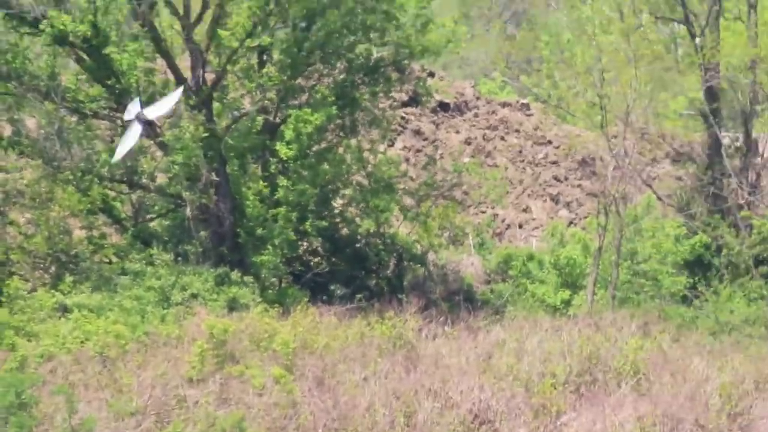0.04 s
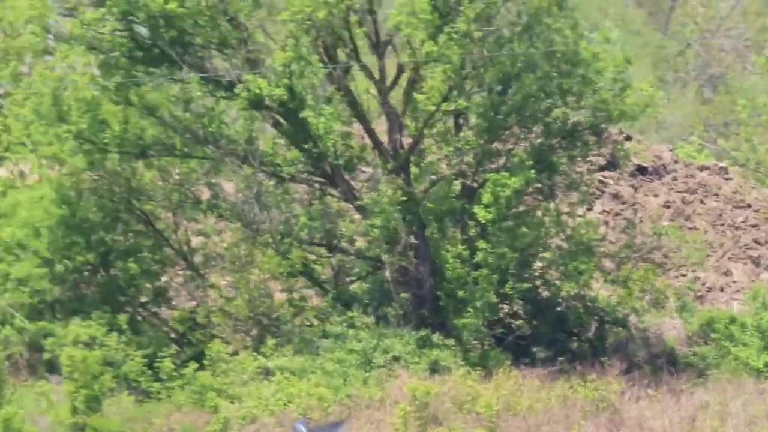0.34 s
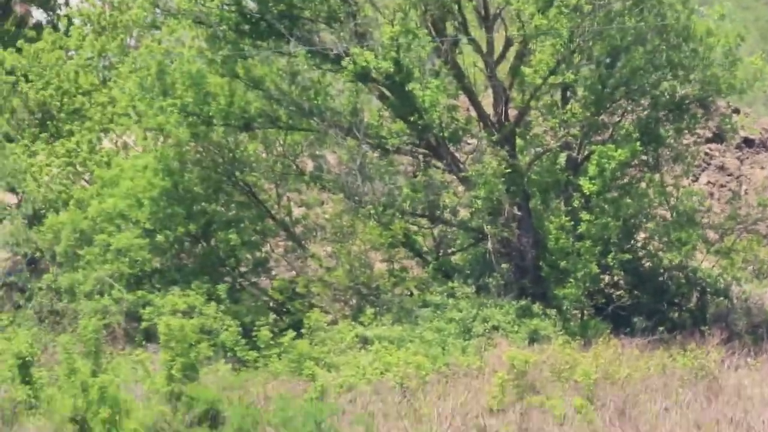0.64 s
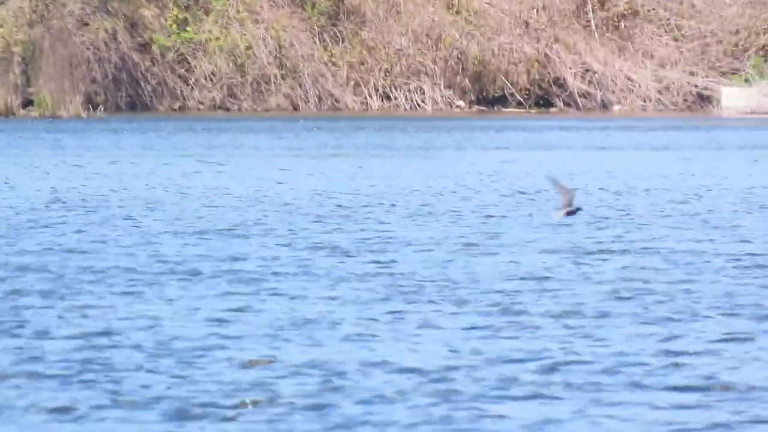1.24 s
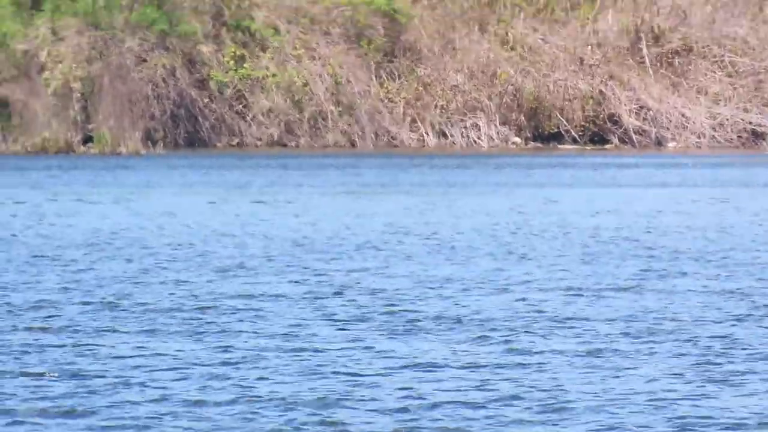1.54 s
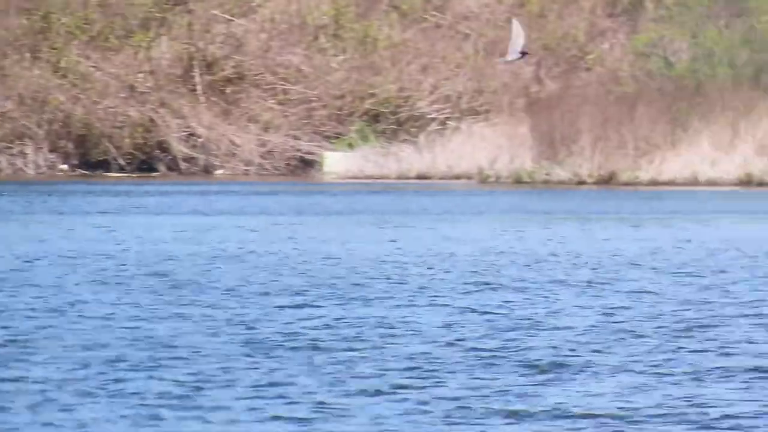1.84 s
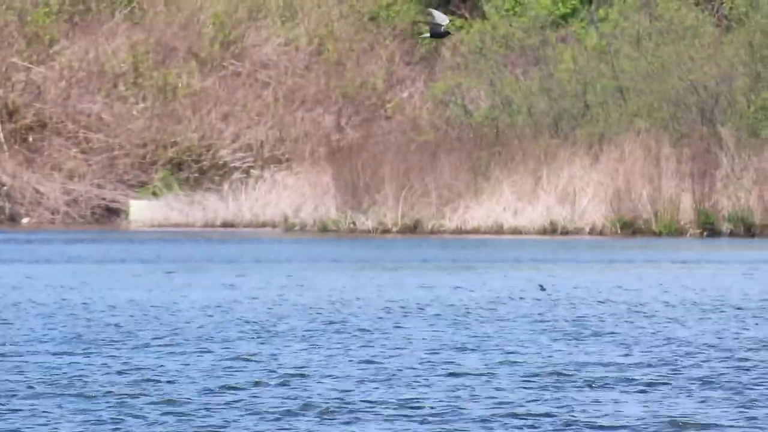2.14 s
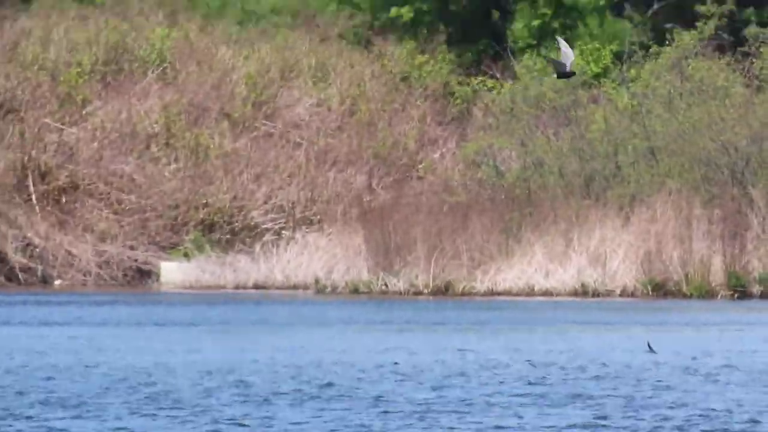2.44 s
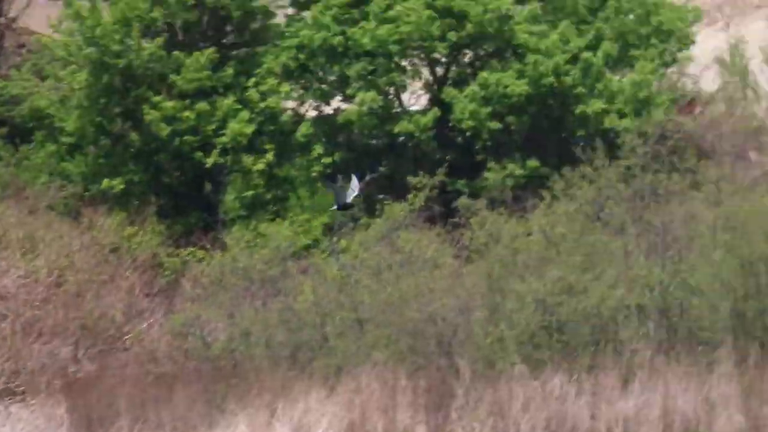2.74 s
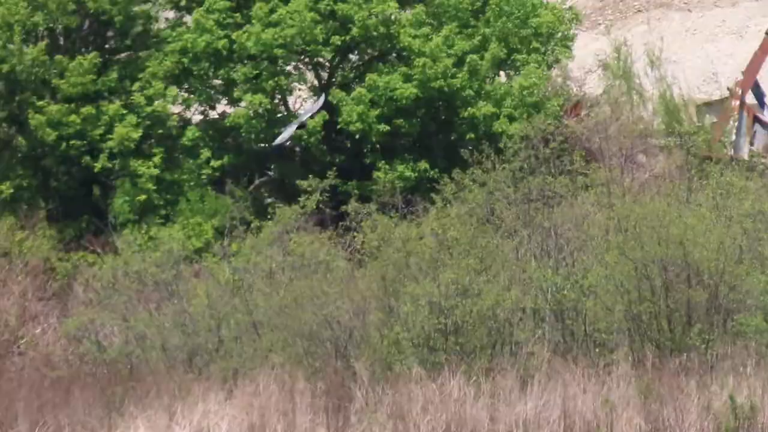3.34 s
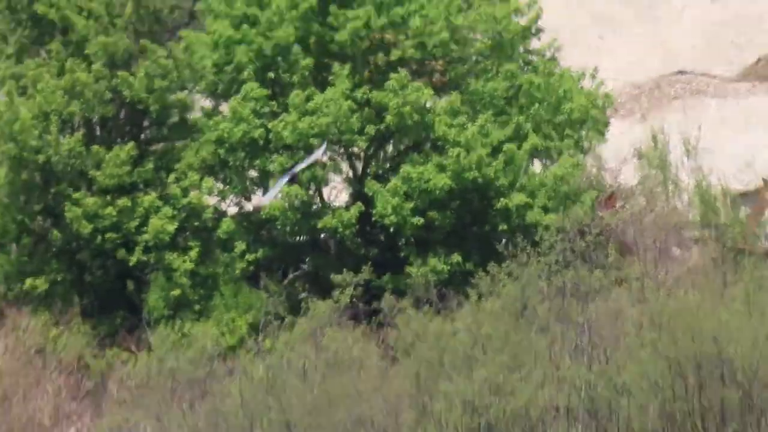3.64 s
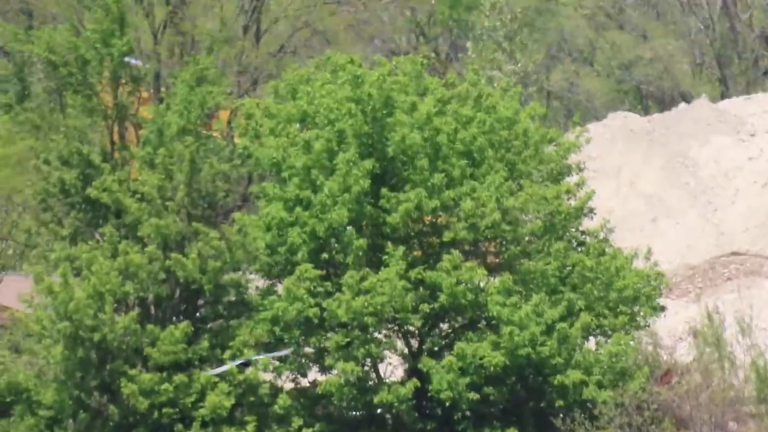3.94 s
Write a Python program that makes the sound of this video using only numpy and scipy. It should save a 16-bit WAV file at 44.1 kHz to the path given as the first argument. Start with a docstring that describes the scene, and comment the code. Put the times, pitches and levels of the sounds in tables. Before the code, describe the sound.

Gusty wind buffets the microphone on a lake shore with low rumble, hollow flutter and short thumps. It is busy through the first second, uneven afterwards, calmer from 3 to 3.6 seconds, then strongest from 3.8. Distant road noise and a soft hiss of reeds and water continue throughout. Faint, far birds whistle from 0.6 seconds, trill just after 1, and give one longer whistle from 2 to 2.5.

```python
"""Lake shore in gusty wind. Eddies buffet the microphone: a low rumble that opens into a hollow
flutter when they hit hard, while small tight ones land as single thumps. Behind it lie the steady
tyre roar of a distant road and a soft hiss of reeds and water. A few faint, far birds whistle
and trill, scattered by the trees."""
import sys
import numpy as np
from scipy import signal
from scipy.fft import rfft, irfft
from scipy.io import wavfile
from scipy.ndimage import uniform_filter1d

SR = 44100
rng = np.random.default_rng(int(sys.argv[2]) if len(sys.argv) > 2 else 0)


def dump_mix(stems):
    """Bounce the given channels to the path in sys.argv[1] as a 16-bit WAV at rate SR."""
    frames = np.atleast_2d(stems).T  # one column per channel
    limited = np.clip(frames, -1, 1)  # hard clip at full scale
    pcm = np.round(limited * 32767).astype(np.int16)
    wavfile.write(sys.argv[1], SR, pcm)


N = 176400


def from_db(db):
    """Decibels to gain."""
    return 10 ** (np.asarray(db) / 20)


def rms_one(x):
    """Scale to unit power."""
    return x / np.sqrt(np.mean(x ** 2) + 1e-20)


def clock():
    """Sample times [s]."""
    return np.arange(N) / SR


def coloured(x, curve):
    """Filter by a (Hz, dB) curve, falling 40 dB per octave above its last point."""
    hz, db = np.transpose(curve)
    bins_hz = np.maximum(np.fft.rfftfreq(N, 1 / SR), 1)
    skirt_db = 40 * np.maximum(np.log2(bins_hz / hz[-1]), 0)
    gain_db = np.interp(np.log(bins_hz), np.log(hz), db) - skirt_db
    return irfft(rfft(x) * from_db(gain_db), N)


def noise(spectrum):
    """Coloured noise, unit power."""
    return rms_one(coloured(rng.standard_normal(N), spectrum))


def widen(mid, spectrum, side_curve):
    """Stereo from mid plus independent side noise, weighted by side_curve."""
    return mid + coloured(noise(spectrum), side_curve) * np.array([[1], [-1]])


def drift(corner_hz):
    """Slow random wander: zero mean, unit spread."""
    bins_hz = np.fft.rfftfreq(N, 1 / SR)
    lowpass = (bins_hz > 0) / (1 + (bins_hz / corner_hz) ** 2)
    return rms_one(irfft(rfft(rng.standard_normal(N)) * lowpass, N))


def road():
    """Far tyre roar, wavering a little in the moving air."""
    # tyre roar spectrum: (frequency [Hz], density [dB])
    roar = [(30, -12.5), (70, -5), (170, -2.5), (350, -9.5), (600, -8.5), (760, -5.5), (900, 1), (1020, 2),
            (1180, -4.5), (1350, -12.5), (1580, -11), (1950, -20), (2600, -29), (4000, -51)]
    # stereo width: (frequency [Hz], side minus mid [dB])
    side = [(100, -54), (500, -56), (1000, -48.5), (1600, -18), (2500, -6)]
    level_db = -38 + 0.6 * drift(corner_hz=13)
    return from_db(level_db) * widen(noise(roar), roar, side)


def shore():
    """Reeds and water: a wide, soft, steady hiss with a few brief rustles."""
    # hiss spectrum: (frequency [Hz], density [dB])
    hiss = [(500, -10), (2000, 3.5), (3200, 4.5), (4300, 2.5), (6000, -2.5), (8500, -7), (11000, -12.5),
            (13500, -17), (15500, -19)]
    # rustle spectrum: (frequency [Hz], density [dB])
    rustle = [(1500, -23), (3000, 0), (4200, 5), (6000, -14), (9000, -13), (14000, -29)]
    # stereo width of both: (frequency [Hz], side minus mid [dB])
    side = [(1000, -27), (3500, -3.5), (6000, -3), (9000, -1), (13000, 3.5)]
    # rustles: (centre time [s], length [s], level [dB])
    rustles = [(1.4, .02, -68), (3.27, 0.042, -58), (3.674, 0.058, -62.5)]
    steady = from_db(-60) * widen(noise(hiss), hiss, side)
    swell = sum(from_db(db) * np.exp(-2 * ((clock() - at_s) / length_s) ** 2)
                for at_s, length_s, db in rustles)
    return steady + swell * widen(noise(rustle), rustle, side)


def whistle(hz, wobble):
    """Pure tone whose pitch wanders by the fraction wobble."""
    return np.sin(2 * np.pi * np.cumsum(hz * (1 + wobble * drift(corner_hz=110))) / SR)


def bird_notes():
    """Gliding or arching whistles that swell and fade."""
    # notes: (onset [s], length [s], start [Hz], end [Hz], arch [Hz], level [dB], wobble [fraction])
    notes = [(.59, .14, 3400, 3200, 0, -60, .06), (.675, .13, 3000, 3420, 190, -57.5, .024),
             (.797, .043, 2120, 2190, 0, -49, .018), (.84, .05, 3500, 3900, 0, -64, .04),
             (.87, .09, 2900, 2950, 0, -63, .01), (2.02, .44, 1370, 1400, 145, -48.5, .003),
             (3.01, .035, 4300, 4200, 0, -60, .01)]
    t, song = clock(), 0
    for at_s, length_s, start_hz, end_hz, arch_hz, db, wobble in notes:
        progress = np.clip((t - at_s) / length_s, 0, 1)
        swell = np.sin(np.pi * progress)
        hz = start_hz + (end_hz - start_hz) * progress + arch_hz * swell
        song = song + from_db(db) * swell * whistle(hz, wobble)
    return song


def bird_trill():
    """One uneven, pulsed whistle that sags in pitch."""
    at_s, length_s, pulses_per_s, sag_s = 1.01, 0.35, 31.5, 0.11
    age_s = np.clip(clock() - at_s, 0, length_s)
    pulses = np.sin(np.pi * pulses_per_s * age_s) ** 2 * (age_s < length_s)
    swell_db = 3.5 * np.sin(np.pi * age_s / length_s)
    level_db = -56 + swell_db + 2 * drift(corner_hz=24)
    hz = 2600 + 150 * np.exp(-age_s / sag_s)
    return from_db(level_db) * pulses * whistle(hz, wobble=0.006)


def birds():
    """Far song plus its short echo, scattered by the trees."""
    echo_db, t60_s = -7, 0.3
    song = bird_notes() + bird_trill()
    tails = rng.standard_normal((2, N)) * np.exp(-np.log(1000) * clock() / t60_s)
    echoes = signal.fftconvolve(song[None], rms_one(tails) / np.sqrt(N), axes=1)[:, :N]
    return song + from_db(echo_db) * echoes


def thumps():
    """Each tight eddy is one brief suck of pressure with an overshoot on either side."""
    # tight eddies: (centre time [s], peak [dB], pitch [Hz])
    eddies = [(0.154, -18, 192), (0.234, -9.5, 200), (0.529, -16, 274), (0.534, -13, 330), (0.76, -10, 283),
              (1.027, -20.5, 360), (1.193, -17.5, 221), (1.315, -19, 224), (1.442, -17.5, 230),
              (1.549, -13.5, 235), (1.711, -21.5, 313), (1.775, -17.5, 181), (2.071, -13.5, 222),
              (2.428, -19, 240), (2.941, -16, 157), (3.706, -14.5, 192), (3.856, -9.5, 338),
              (3.943, -10, 185)]
    half_width_cycles = 0.63
    t, out = clock(), 0
    for at_s, db, hz in eddies:
        cycles = (t - at_s) * hz
        envelope = np.exp(-(cycles / half_width_cycles) ** 2)
        out = out - from_db(db) * np.cos(2 * np.pi * cycles) * envelope
    return out


def wind_strength():
    """Flow plus buffets, stirred by small swirls: (strength above typical [dB], brightness [dB])."""
    # wind between buffets: (time [s], relative level [dB])
    flow = [(0.0, -20.5), (0.07, -58), (0.11, -31), (0.29, -29), (0.35, -28.5), (0.5, -23), (0.61, -27.5),
            (0.7, -34), (0.74, -37), (0.81, -31), (0.87, -37), (0.95, -38.5), (1.08, -45), (1.14, -33),
            (1.25, -39), (1.39, -33.5), (1.54, -45), (1.68, -27.5), (1.73, -42), (1.95, -32.5), (2.04, -45),
            (2.23, -32), (2.31, -52), (2.37, -34), (2.44, -29), (2.53, -40), (2.68, -53), (2.77, -37),
            (2.95, -34.5), (3.07, -43.5), (3.22, -46), (3.4, -43), (3.66, -33.5), (3.75, -49), (3.82, -25),
            (3.97, -28), (4.0, -15.5)]
    # eddies hitting the microphone: (time [s], relative peak [dB], hold [s], extra brightness [dB])
    buffets = [(0.02, -14, 0.028, 0), (0.093, -19, 0.0092, -5), (0.14, -12.5, 0.019, 2.5),
               (0.195, -16, 0.019, -5), (0.222, -12, 0.019, 1.5), (0.246, -18.5, 0.011, 6.5),
               (0.38, -16.5, 0.016, 2), (0.415, -9, 0.016, -1), (0.475, -20.5, 0.019, 0),
               (0.521, -11, 0.0086, 4), (0.546, -12, 0.0055, 6), (0.592, -10.5, 0.024, -1),
               (0.624, -16, 0.028, 3), (0.688, -11, 0.021, 2), (0.725, -17, 0.0033, 2),
               (0.759, -12.5, 0.02, 3), (0.788, -15, 0.0071, 3), (0.815, -15.5, 0.025, -1),
               (0.898, -18, 0.035, 3.5), (1.007, -16, 0.031, 6.5), (1.178, -21, 0.021, -3),
               (1.328, -18.5, 0.026, 6.5), (1.419, -19.5, 0.0045, -5), (1.437, -20, 0.012, -3),
               (1.484, -16.5, 0.0089, 4), (1.518, -17, 0.034, -2), (1.611, -18, 0.01, -5),
               (1.644, -26, 0.031, -7), (1.704, -22, 0.0065, -3), (2.066, -13.5, 0.013, 2.5),
               (2.104, -16, 0.026, -9), (2.2, -13, 0.012, -2.5), (2.241, -11, 0.022, -4),
               (2.324, -20.5, 0.0088, 8.5), (2.346, -21, 0.024, 5), (2.424, -15.5, 0.017, 3),
               (2.476, -21, 0.014, -6), (2.554, -20, 0.035, 1), (2.604, -21.5, 0.0064, 1),
               (2.631, -22, 0.01, 4), (2.88, -22.5, 0.026, 6.5), (2.938, -19, 0.0074, 2),
               (2.961, -19.5, 0.01, 3), (3.092, -26.5, 0.035, 0), (3.578, -19.5, 0.019, 1),
               (3.701, -21, 0.015, -5), (3.792, -20, 0.039, 2), (3.826, -9, 0.011, -0.5),
               (3.853, -6, 0.014, 2), (3.912, -12, 0.021, -1), (3.944, -11.5, 0.041, -3),
               (3.978, -12.5, 0.026, 1.5)]
    attack_s, release_s, typical_db = 0.0058, 0.011, -29.5
    t, weighted_brightness = clock(), 0
    power = from_db(np.interp(t, *np.transpose(flow)) + 0.4) ** 2
    for at_s, db, hold_s, bright_db in buffets:
        rise = np.clip((t - at_s) / attack_s + 1, 0, 1)
        fall = np.exp(-np.clip(t - at_s - hold_s, 0, 1) / release_s)
        buffet_power = (from_db(db - 8) * rise * fall) ** 2
        power = power + buffet_power
        weighted_brightness = weighted_brightness + bright_db * buffet_power
    swirl_db = 2.4 * drift(corner_hz=90)
    return 10 * np.log10(power) + swirl_db - typical_db, weighted_brightness / power


def wind():
    """Turbulence at the microphone: the harder it blows, the more the upper bands take over."""
    # low rumble spectrum: (frequency [Hz], density [dB])
    rumble = [(15, -28), (25, -4), (42, -12), (68, 1), (110, 4), (170, 0.5), (260, -9), (500, -34)]
    # hollow flutter spectrum: (frequency [Hz], density [dB])
    flutter = [(50, -13.5), (110, -5), (180, 2.5), (260, -0.5), (350, -6), (460, -9.5), (560, -20.5),
               (800, -46.5), (1400, -39.5), (3000, -90)]
    # flutter spectrum under hard hits: (frequency [Hz], density [dB])
    hard_flutter = [(120, -30.5), (230, -0.5), (330, 3.5), (460, -6), (540, -18.5), (700, -16.5),
                    (1100, -41.5), (2000, -48.5), (4000, -58)]
    # stereo width: (frequency [Hz], side minus mid [dB])
    side = [(60, -62), (120, -56.5), (200, -50), (400, -23), (800, -12)]
    # rumble contour: (time [s], relative level [dB])
    rumble_contour = [(0.0, -39.5), (0.65, -43), (0.73, -49.5), (1.14, -37), (1.17, -31.5), (1.269, -52),
                      (1.32, -34), (1.64, -39), (2.25, -37), (2.55, -35.5), (2.68, -41.5), (2.8, -35),
                      (3.12, -36.5), (3.21, -51), (3.32, -36), (3.49, -45), (3.71, -31.5), (3.74, -47),
                      (3.869, -31), (4.0, -36)]
    strength_db, bright_db = wind_strength()
    rumble_db = np.interp(clock(), *np.transpose(rumble_contour)) + 2 + 0.12 * strength_db
    flutter_db = -32.5 + 0.88 * strength_db
    hard_db = -41.5 + 1.414 * strength_db + bright_db
    window_s, out = 0.014, 0
    for spectrum, db in ((rumble, rumble_db), (flutter, flutter_db), (hard_flutter, hard_db)):
        churn = noise(spectrum)
        power = uniform_filter1d(np.abs(signal.hilbert(churn)) ** 2, int(window_s * SR))
        even = rms_one(churn / np.sqrt(power))   # flatten the noise's own swells
        out = out + from_db(db) * widen(even, spectrum, side)
    return out


def scene():
    """Wind in front, the lakeside behind."""
    return wind() + thumps() + road() + shore() + birds()


def record(dry):
    """The microphone sheds the deepest bass; the ends fade and the top is cut steeply."""
    low_cut_hz, high_cut_hz, fade_s = 38, 15700, 0.004
    highpass = signal.butter(2, low_cut_hz, "high", fs=SR, output="sos")
    lowpass = signal.ellip(10, 0.1, 80, high_cut_hz, fs=SR, output="sos")
    fade = np.clip(np.minimum(clock(), clock()[::-1]) / fade_s, 0, 1)
    return signal.sosfilt(lowpass, signal.sosfilt(highpass, dry) * fade)


dry = scene()
out = record(dry)
dump_mix(out)
```